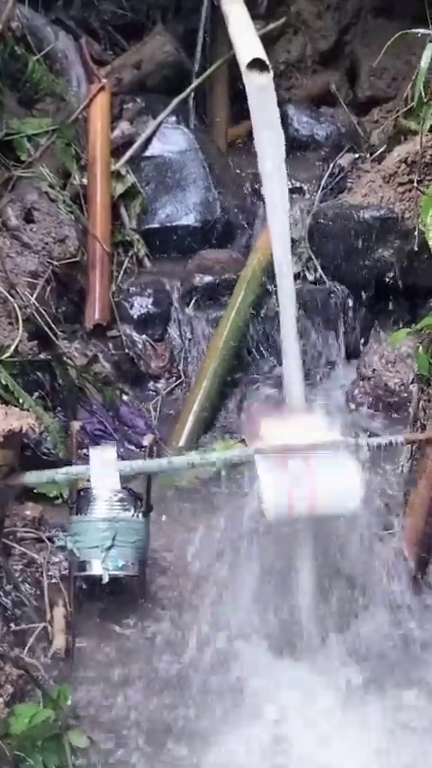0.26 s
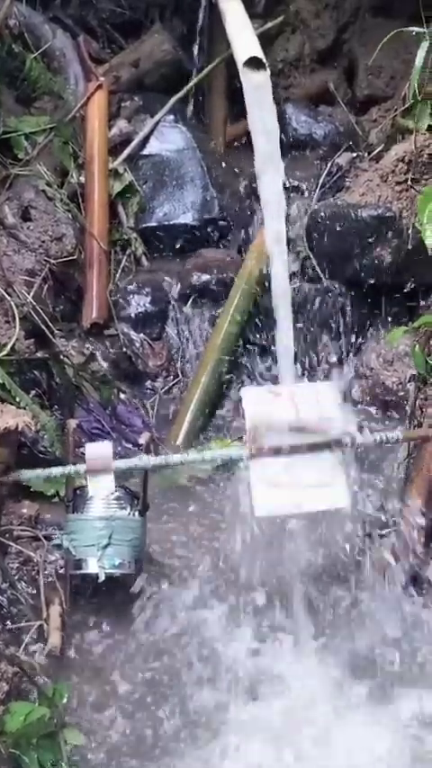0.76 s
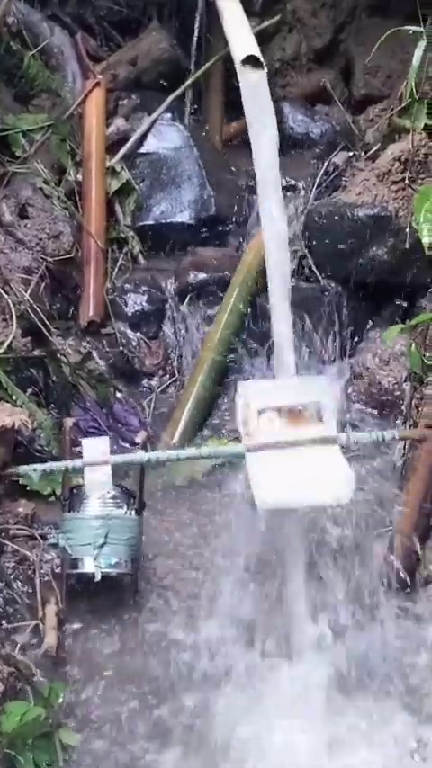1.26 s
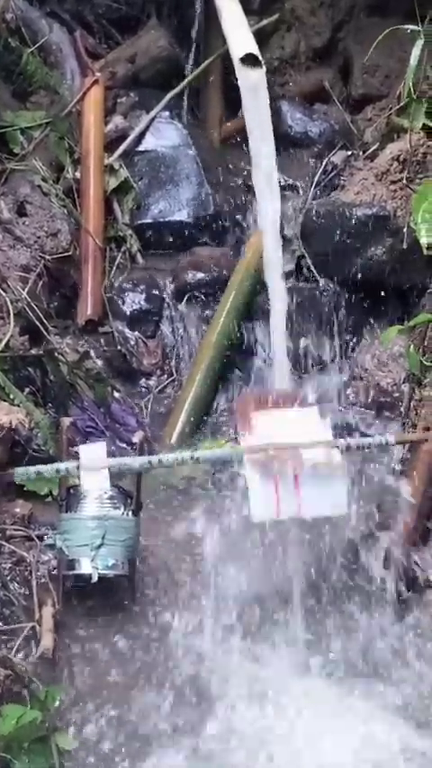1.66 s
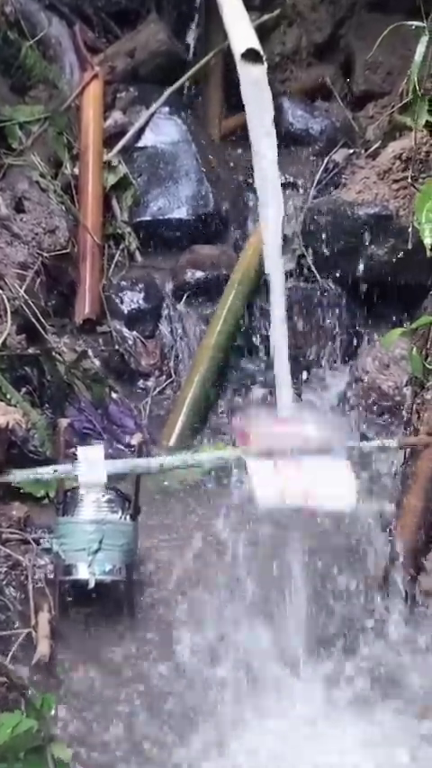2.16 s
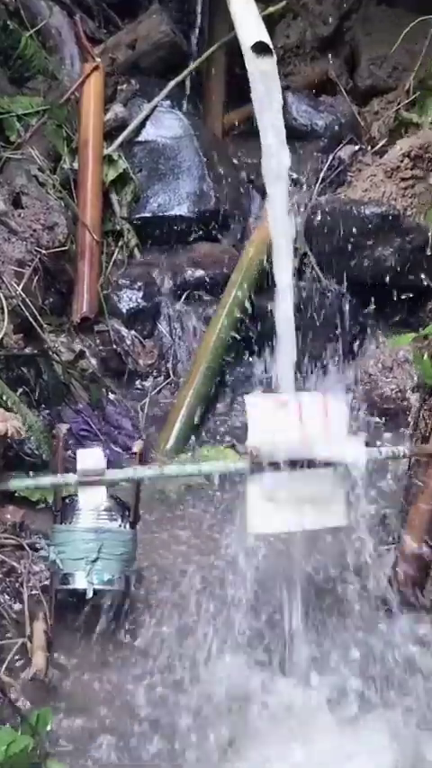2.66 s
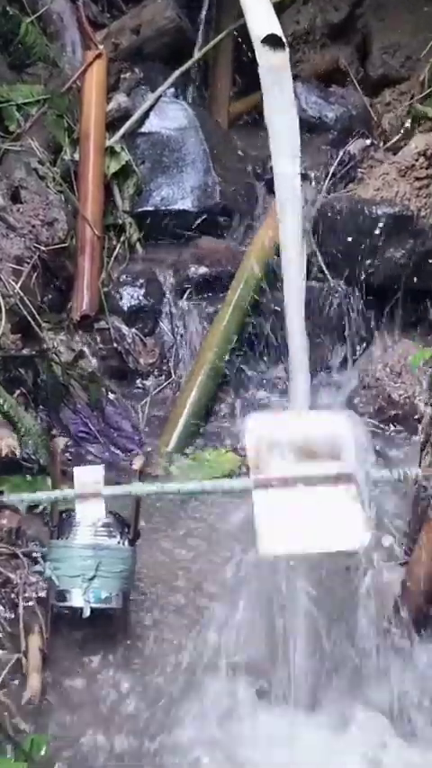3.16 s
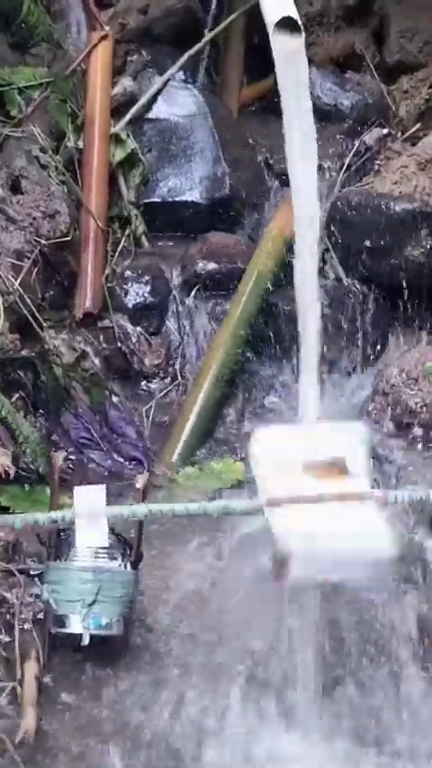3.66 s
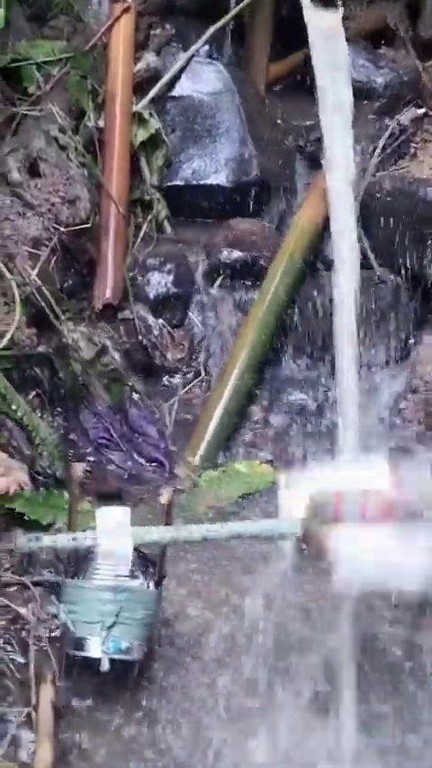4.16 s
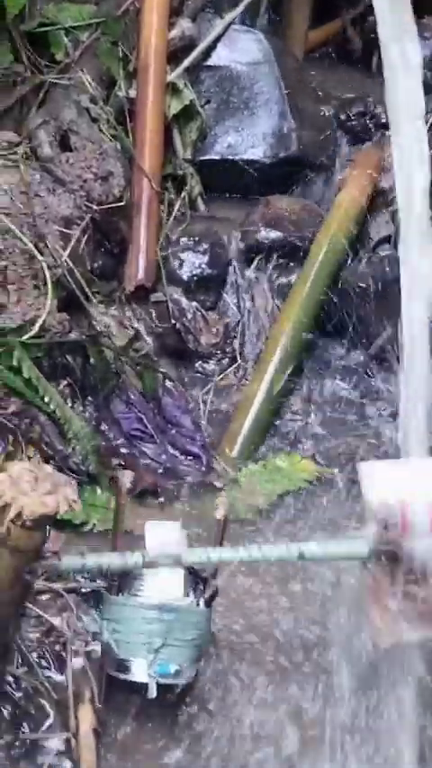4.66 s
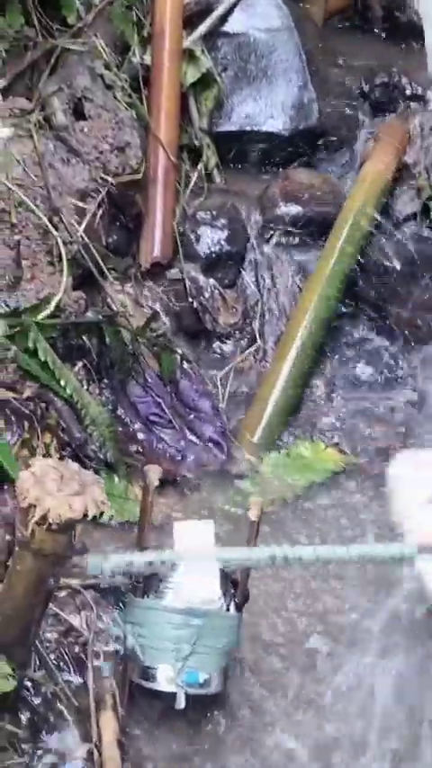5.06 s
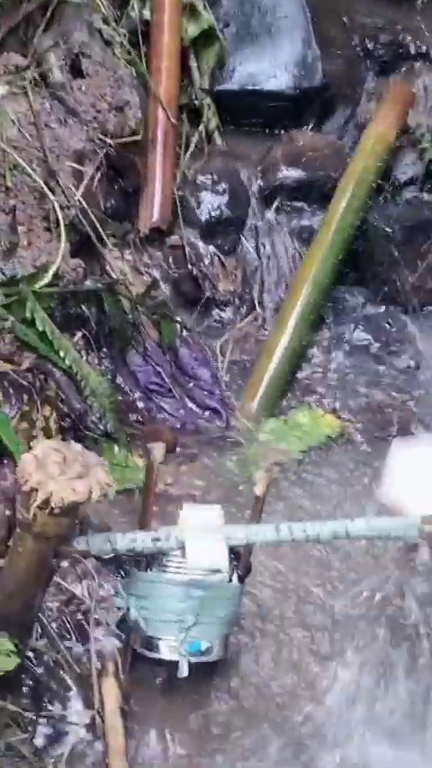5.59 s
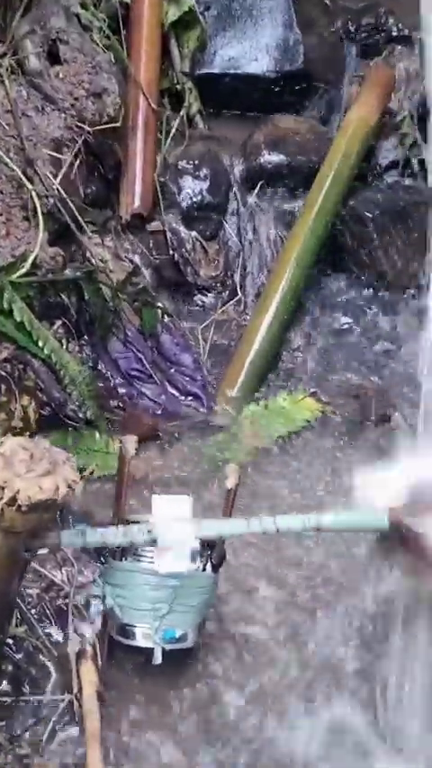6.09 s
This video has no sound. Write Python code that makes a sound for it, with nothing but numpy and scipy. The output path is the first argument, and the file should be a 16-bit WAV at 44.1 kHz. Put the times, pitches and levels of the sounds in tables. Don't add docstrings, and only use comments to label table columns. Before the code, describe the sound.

Continuous rapid tinny rattling, close up outdoors: four slightly different flap slaps per turn, just over six turns a second, each a papery scrape and short nasal can ring near eight hundred hertz. A faint water jet hisses and splashes underneath, with small low wind-like thumps from spray and two little drips past four and a half seconds. Phone microphone, dry, loud and rather compressed.

```python
import sys
import numpy as np
from scipy import signal
from scipy.fft import rfft, irfft
from scipy.io import wavfile
from scipy.ndimage import uniform_filter1d

SR = 44100
rng = np.random.default_rng(int(sys.argv[2]) if len(sys.argv) > 2 else 0)


def voltage_ratio(decibels):
    exponent = np.asarray(decibels, float) / 20
    return 10 ** exponent


def materialize(psi):
    bounded = np.clip(np.atleast_2d(psi).T, -1, 1)
    quanta = np.round(bounded * 32767).astype(np.int16)
    wavfile.write(sys.argv[1], SR, quanta)


N = 279153


def unit(x):
    return x / np.sqrt(np.mean(x ** 2))


def butter(x, order, hz, kind):
    return signal.sosfilt(signal.butter(order, hz, kind, fs=SR, output="sos"), x)


def colour(x, points):
    hz, db = np.transpose(points)
    grid_hz = np.fft.rfftfreq(2048, 1 / SR) + 1
    log_gain = np.interp(np.log(grid_hz), np.log(hz), db) * np.log(10) / 20
    cepstrum = irfft(log_gain)
    cepstrum[1:1024] *= 2
    cepstrum[1025:] = 0
    return signal.fftconvolve(x, irfft(np.exp(rfft(cepstrum))))[:N]


def place(times_s, shapes):
    out = np.zeros(N + 2 * SR)
    length = shapes.shape[1]
    for s, shape in zip(times_s, shapes):
        start = int((s + 1) * SR)
        out[start:start + length] += shape
    return out[SR:SR + N]


def walk(rate_hz):
    hold = int(SR / rate_hz)
    steps = np.repeat(rng.standard_normal(N // hold + 1), hold)
    return unit(uniform_filter1d(steps, hold)[:N])


def puff(t, rise_s, decay_s):
    return t / rise_s * np.exp(1 - t / decay_s)


def between(s, views_s):
    return np.array([np.interp(s, views_s, one) for one in np.eye(len(views_s))])


# time in seconds, peak in dB, pitch in Hz.
GUSTS = [(0.006, -45, 200), (0.556, -31.5, 198), (0.752, -35.5, 312), (0.876, -35.5, 178),
         (0.953, -39, 285), (1.222, -35, 204), (1.351, -40, 183), (1.851, -39.5, 326), (2.328, -36, 192),
         (2.539, -41, 269), (2.804, -39, 187), (2.889, -39, 231), (2.963, -35.5, 265), (3.275, -39, 176),
         (3.41, -41, 183), (3.76, -37, 271), (4.039, -36, 187), (4.153, -39.1, 209), (4.228, -33, 185),
         (4.432, -38, 175.3), (4.629, -40, 172), (4.705, -37, 204), (5.022, -32, 258),
         (5.179, -33.5, 190.3), (5.707, -37.5, 181.2), (6.112, -33, 190), (6.193, -35, 188),
         (6.279, -33, 180)]


def gusts():
    s, peak_db, hz = np.transpose(GUSTS)
    t = np.arange(SR // 10) / SR
    level = voltage_ratio(peak_db)[:, None]
    eddy_s = t + 0.22 * 0.0071 * (1 - np.exp(-t / 0.0047))
    start_turn = rng.random((len(s), 1))
    thump = np.sin(2 * np.pi * (hz[:, None] * eddy_s + start_turn))
    thumps = place(s - 0.007, level * puff(t, 0.0069, 0.0053) * thump)
    rumble_hz_db = [(30, -10), (70, -17), (120, -0.5), (190, 10.5), (320, 4.0), (520, -35), (2000, -88.0)]
    rumble = unit(colour(rng.standard_normal(N), rumble_hz_db))
    flutter = voltage_ratio(-60 + 3.7 * walk(18))
    flutter = flutter + voltage_ratio(-5.0) * place(s - 0.009, level * puff(t, 0.013, 0.0092))
    return thumps + rumble * flutter


# frequency in Hz, gain in dB.
SPLASH_COLOUR = [(40, -55), (110, -26), (200, -6), (400, 0), (1100, 4), (1700, 5.5), (3000, 0),
                 (7000, -1.5), (9500, -8.5), (12000, -7), (15700, -5)]
# time in seconds, splash level in dB.
JET_FLOW = [
    (0, -39),
    (1, -39),
    (2, -37),
    (3, -39.5),
    (4, -36.5),
    (5, -37),
    (6.33, -37),
]


def water():
    hits = rng.random(N) < 2500 / SR
    drops = hits * rng.standard_normal(N) * voltage_ratio(1.6 * rng.exponential(size=N))
    hiss = rng.standard_normal(N) * voltage_ratio(2.5 * walk(20))
    spray = unit(hiss + voltage_ratio(-10.5) * unit(drops))
    edges_hz = 40 * 2. ** np.arange(0, 9.1, 0.75)
    splash = 0
    for band_hz in zip(edges_hz, edges_hz[1:]):
        splash = splash + butter(spray, 2, band_hz, "band") * voltage_ratio(2.3 * walk(70))
    flow_db = np.interp(np.arange(N) / SR, *np.transpose(JET_FLOW))
    return unit(colour(splash, SPLASH_COLOUR)) * voltage_ratio(flow_db)


# time in seconds, peak in dB, pitch in Hz.
BUBBLES = [
    (4.504, -23, 1150),
    (4.844, -21, 1150),
    (4.921, -34, 1550),
]


def drips():
    s, peak_db, hz = np.transpose(BUBBLES)[:, :, None]
    t = np.arange(SR // 20) / SR
    bubble = np.sin(2 * np.pi * hz * (0.92 * t + 6.3 * t ** 2)) * puff(t, 0.0041, 0.0029)
    return place(s[:, 0], voltage_ratio(peak_db + 1.5) * bubble)


TIN_VIEWS_S = (2.64, 3.5, 4.6, 5.1)
# time in seconds, lateness in ms, force in dB.
WHEEL_SLIP = [(0, 1.5, 1), (0.668, -7, 1), (0.772, -4.5, 1.5), (1.11, -12.5, 0.5), (1.302, -3, 1.5),
              (1.668, -13.5, 1.5), (2.34, -3.5, 1), (2.71, -5.5, 1), (2.812, -1.2, 2), (3.358, 1.34, 1),
              (3.792, -0.94, -0.5), (3.922, 4.5, 0.5), (4.292, -3.5, 0.5), (4.69, 1, 0), (5.391, -4.5, 2.2),
              (5.491, 5.5, 0.5), (5.801, 7, 0.5), (6.33, 27, 2)]
# place in the turn in seconds, peak in dB, clang and sizzle in dB against the peak.
FLAP_EDGES = [
    (.041, -5.5, -18, -19),
    (0.077, -3, -19.5, -21.5),
    (0.126, -4, -18, -20),
    (0.153, -5, -20.5, -22.5),
]


def slaps():
    turn_s, loudest_db = 0.158, -2.5
    scatter_db = (0.77, 1.15, 0.5)
    clang_view_db, sizzle_view_db = (-0.77, 1.5, 2.5, 0.5), (0.64, -0.42, 2.6, -0.32)
    edge_count = len(FLAP_EDGES)
    count = np.arange(-1, int(N / SR / turn_s) * edge_count - 1)
    edge = count % edge_count
    at_s, peak_db, clang_db, sizzle_db = np.transpose(FLAP_EDGES)[:, edge]
    steady_s = count // edge_count * turn_s + at_s
    when_s, late_ms, force_db = np.transpose(WHEEL_SLIP)
    s = steady_s + np.interp(steady_s, when_s, late_ms) / 1000
    chance_db = (rng.standard_normal((len(s), 3)) * scatter_db).T
    view = between(s, TIN_VIEWS_S)
    peak_db = np.minimum(peak_db + np.interp(s, when_s, force_db) + chance_db[0], loudest_db)
    clang_db = clang_db + clang_view_db @ view + chance_db[1]
    sizzle_db = sizzle_db + sizzle_view_db @ view + chance_db[2]
    return s, edge, peak_db, clang_db, sizzle_db


def touch(s, edge, db):
    edge_brush_db = np.array((-12.5, -18.5, -9.5, -22))
    t = np.arange(SR // 40) / SR
    chance = rng.standard_normal((len(s), 2, len(t)))
    swell = np.exp((t - t[-1]) / 0.0067)
    brush = chance[:, 0] * swell * voltage_ratio(db + edge_brush_db[edge])[:, None]
    tick = chance[:, 1] * np.exp(-t / 0.0014) * voltage_ratio(0.61 * db)[:, None]
    return place(s - t[-1], brush), place(s + 0.00081, tick)


# chatter length in seconds, chatter in dB, blow in dB.
EDGE_CHATTER = [(0.025, -5.5, -7.5), (0.018, -6, -1.5), (0.017, -3, -5), (0.017, -4, -4)]


def contact(edge):
    t = np.arange(SR // 20) / SR
    lasts_s, chatter_db, blow_db = np.transpose(EDGE_CHATTER)[:, edge, None]
    chance = rng.standard_normal((len(edge), 2, len(t)))
    habit = rng.standard_normal((len(EDGE_CHATTER), len(t)))[edge]
    grit = (chance[:, 0] + 1.53 * habit * np.exp(-t / 0.011)) * voltage_ratio(1.0 * chance[:, 1])
    blow = voltage_ratio(blow_db) * puff(t, 0.0022, 0.0025)
    slip_off = 1 / (1 + np.exp((t - lasts_s) / 0.00033))
    slide = np.exp(-t / 0.025) * slip_off + voltage_ratio(2.0) * np.exp(-t / 0.012)
    return grit * (blow + voltage_ratio(chatter_db) * (1 - np.exp(-t / 0.0017)) * slide)


# frequency in Hz, t60 in seconds.
DRUM_MODES = [(612, 0.082), (647, 0.12), (671, 0.066), (742, 0.07), (810, .041), (843, 0.066), (875, 0.024),
              (917, 0.063), (954, 0.061)]
DRUM_SIDE = [(0.034, -0.024, 0.029, 0.053, 0.14, -0.45, -0.52, 0.34, 0.007),
             (0.096, -0.082, 0.032, 0.011, 1, -0.5, -0.47, -0.37, 0.57),
             (0.011, -0.071, 0.011, 0.02, -0.22, -2.5, -0.38, 0.86, 0.037),
             (0.035, -0.091, 0.059, 0.013, 1, -0.25, -0.3, -1.03, 0.16)]
DRUM_HALF = [(-.01, 0.053, -0.24, 0.12, 0.63, -0.89, -0.19, 0.16, 0.016),
             (-.01, 0.16, -0.36, -0.15, 1.57, -0.89, 0.031, -0.33, 0.24),
             (-.01, .03, -0.054, -0.0021, 1.4, -.99, -0.31, 0.21, 0.019),
             (-.01, 0.008, -0.22, -0.15, 1.14, -0.69, 0.0071, -0.37, 0.11)]
DRUM_MOUTH = [(0.029, 0.0071, -0.32, 0.24, 0.76, -0.29, -0.22, -0.07, -0.026),
              (0.015, 0.086, -0.31, -0.19, 0.93, -0.31, -0.15, -0.03, -0.1),
              (0.0099, 0.037, -0.018, -0.21, 1.8, -0.035, -0.6, 0.094, -.08),
              (-0.011, 0.093, -0.16, -0.47, 0.86, -0.29, 0.2, -0.15, -0.032)]


def drum(s, peak_db, edge):
    views_s = (2.7, 3.58, 5.13)
    push_s = np.array((0.0016, 0.0012, 0.0028, 0.0032))
    t = np.arange(SR // 6) / SR
    hz, t60_s = np.transpose(DRUM_MODES)
    views = np.array([DRUM_SIDE, DRUM_HALF, DRUM_MOUTH])
    chance = rng.standard_normal((len(s), 2, len(hz)))
    share = np.einsum("ve,vem->em", between(s, views_s), views[:, edge])
    share = share * voltage_ratio(0.43 * chance[:, 0])
    pitch_hz = hz * (1 + 0.0072 * chance[:, 1])
    decay = np.exp(-np.log(1000) * t / t60_s[:, None])
    modes = np.sin(2 * np.pi * pitch_hz[..., None] * t) * decay
    notes = np.einsum("em,emt->et", share, modes)
    notes = notes * (1 - np.exp(-(t / push_s[edge, None]) ** 2))
    notes = butter(notes, 2, 480., "high")
    return place(s, notes * (voltage_ratio(peak_db) / abs(notes).max(axis=1))[:, None])


def ring(clang, sizzle, modes):
    out = 0
    for hz, width_hz, db in modes:
        force = clang if hz < 4250 else sizzle
        pole = np.exp((2j * hz - width_hz) * np.pi / SR)
        out = out + voltage_ratio(db) * (1 - abs(pole)) * signal.lfilter([1], [1, -pole], force).imag
    return out


# frequency in Hz, width in Hz, level in dB.
WALL_SIDE = [(1280, 37, -10.5), (1625, 24, -2.5), (2106, 17, -40), (2055, 42, 1.5), (2920, 20, -9),
             (2984, 40, 3), (2935, 38, -5), (3866, 79, 0.5), (4120, 63, -7), (4404, 44, -8), (4740, 85, -9),
             (5170, 130, -12.5), (5730, 28, -7), (5620, 65, -8), (6600, 89, -5), (7130, 100, -5),
             (8150, 100, -8), (8740, 37, -31.5), (11300, 220, -14.5), (11800, 130, -12)]
# frequency in Hz, width in Hz, level in dB.
WALL_HALF = [(1110, 40, -5), (1295, 220, -6), (1923, 53, 4.5), (2153, 120, -2), (2920, 10.4, -0.5),
             (2817, 37.6, -0.5), (3042, 35.4, 12.5), (3798, 33, 0.5), (4580, 20, -1), (4384, 810, -3.5),
             (5530, 50, 6), (5940, 26, -22), (6800, 63, 1), (6800, 48, -2), (8030, 99, -1.5),
             (7600, 55, -7), (9830, 100, -6), (11580, 200, -5.5)]
# frequency in Hz, width in Hz, level in dB.
WALL_MOUTH = [(1106, 30, 0.5), (1384, 52, -10), (1746, 16, 6), (2052, 34, 3), (2127, 41, -2),
              (2722, 30, -1.5), (3055, 70, -5), (2957, 110, -2), (3762, 58, -1), (4105, 48.5, -4.5),
              (4500, 210, -0.5), (5100, 33, -3), (5590, 35, 3), (5420, 57, -3), (6950, 60, -7),
              (6500, 140, -8), (7900, 96, -6), (8400, 49, -27), (9800, 270, -22), (11760, 240, -9.5)]


def walls(clang, sizzle):
    late = [m for m in WALL_MOUTH if m[0] < 2500] + [m for m in WALL_HALF if m[0] > 2500]
    views = [unit(ring(clang, sizzle, modes)) for modes in (WALL_SIDE, WALL_HALF, late, WALL_MOUTH)]
    heard = (between(np.arange(N) / SR, TIN_VIEWS_S) * views).sum(axis=0)
    return butter(heard, 3, 800., "high")


# frequency in Hz, gain in dB.
CRACK_COLOUR = [(900, -39.5), (2300, -19.5), (3400, -14), (5000, 4.5), (7100, 28.5), (9000, 7),
                (13000, -22), (15700, 2)]


def can():
    s, edge, peak_db, clang_db, sizzle_db = slaps()
    s = s - 0.0026
    bend_s = s + 0.0008
    force = contact(edge)
    spray = voltage_ratio(-36.0 + 3.2 * walk(45)) * rng.standard_normal(N)
    t = np.arange(force.shape[1]) / SR
    knock = voltage_ratio(12.5) * np.exp(-((t - 0.0008) / 0.00007) ** 2)
    clang = place(bend_s, (knock + voltage_ratio(2.0) * force) * voltage_ratio(peak_db + clang_db + 21)[:, None])
    sizzle = place(bend_s, force * voltage_ratio(peak_db + sizzle_db + 23.5)[:, None])
    brush, tick = touch(bend_s, edge, peak_db + sizzle_db + 25.5)
    tick = butter(tick, 2, 8000., "high")
    spray = spray + brush
    ringing = walls(clang + spray, sizzle + spray)
    hum = butter(spray + voltage_ratio(3.5) * brush, 2, (718, 907), "band")
    crack = unit(colour(sizzle + brush, CRACK_COLOUR))
    out = drum(s, peak_db, edge) + voltage_ratio(-8.5) * hum
    out = out + voltage_ratio(-27.5) * ringing + voltage_ratio(-33) * crack
    return out + voltage_ratio(-43.5) * unit(tick)


def scene():
    return (gusts() + water() + drips() + can())[None]


def low_pass(x):
    return signal.sosfilt(signal.butter(12, 15750, fs=SR, output="sos"), x)


# frequency in Hz, gain in dB.
PHONE_COLOUR = [(1500, -1), (1680, -9), (2000, 1), (2360, -5.5), (2700, 2.5), (7250, -0.5), (7700, -17),
                (8500, -11.5), (9500, -23), (10600, -13), (11800, -11.5), (12700, -15.5), (14000, -21),
                (15700, -23)]


def record(dry):
    x = np.tanh(0.91 * colour(dry[0], PHONE_COLOUR)) / 0.83
    x = butter(x[None], 2, 80., "high")
    x = signal.sosfilt(signal.ellip(8, 0.2, 60, 15750, fs=SR, output="sos"), x)
    return low_pass(x)


dry = scene()
out = record(dry)
materialize(out)
```